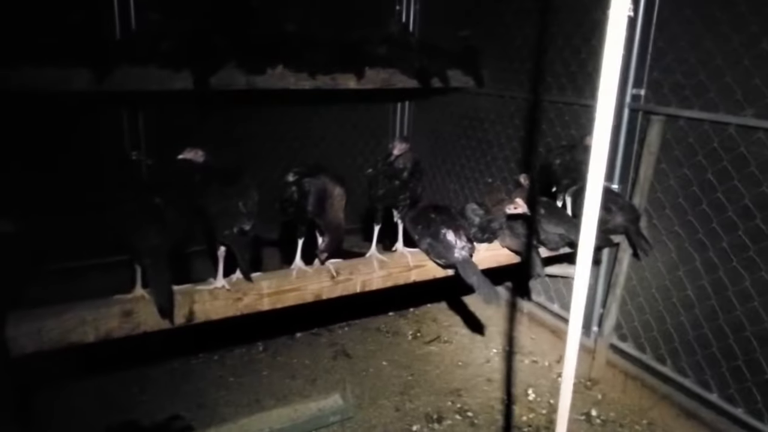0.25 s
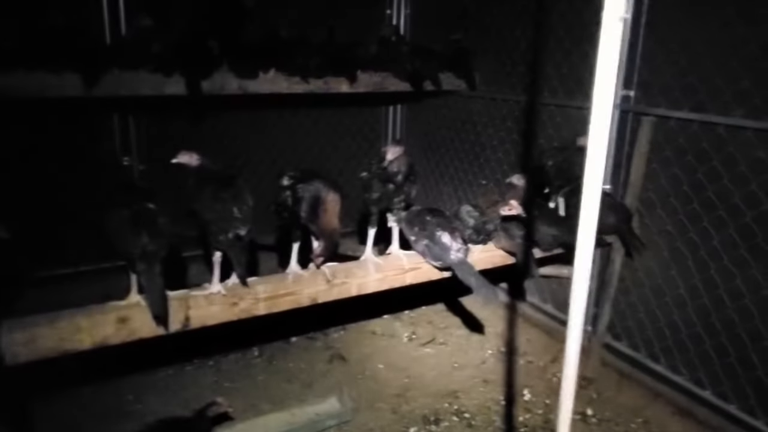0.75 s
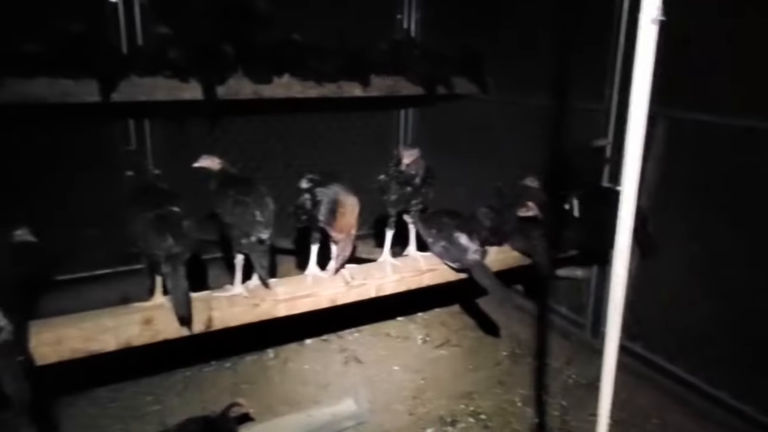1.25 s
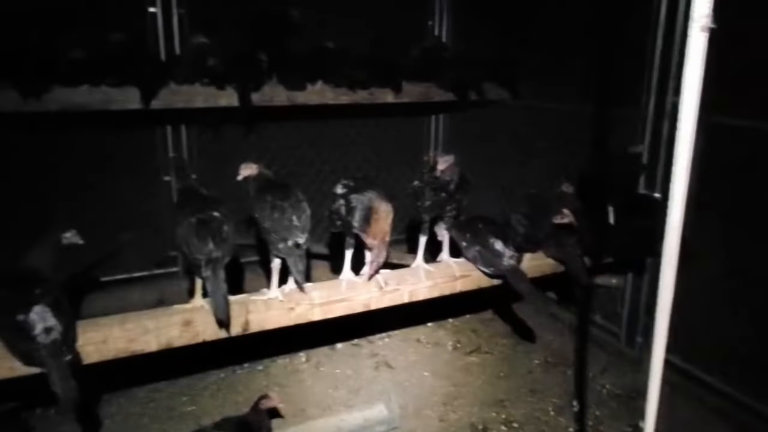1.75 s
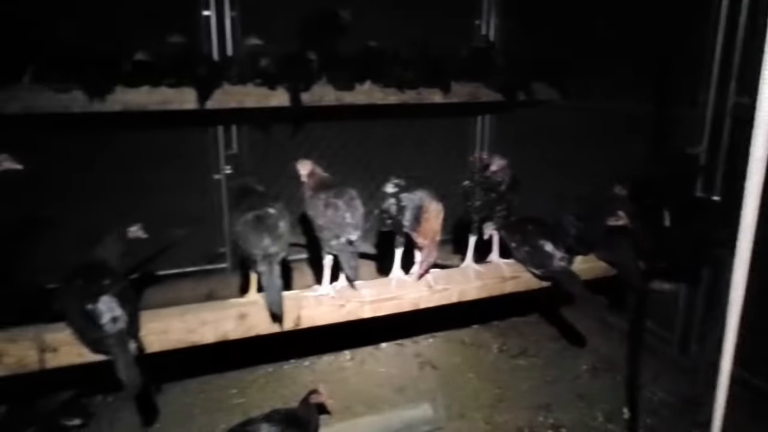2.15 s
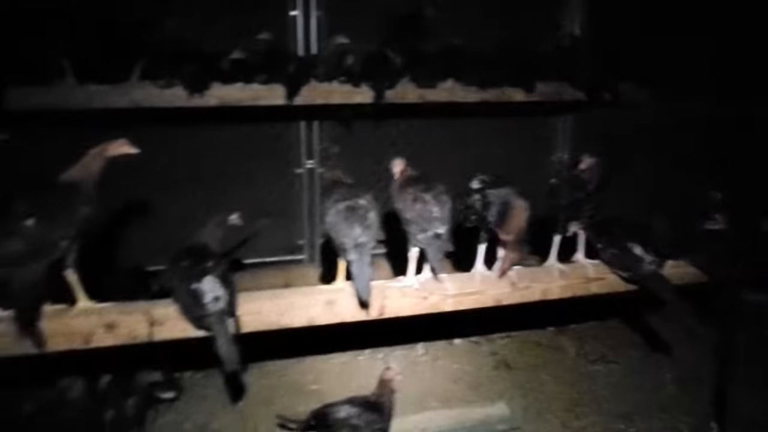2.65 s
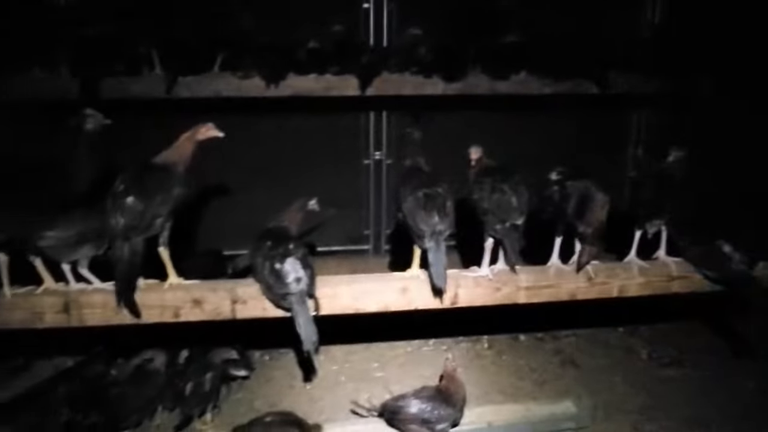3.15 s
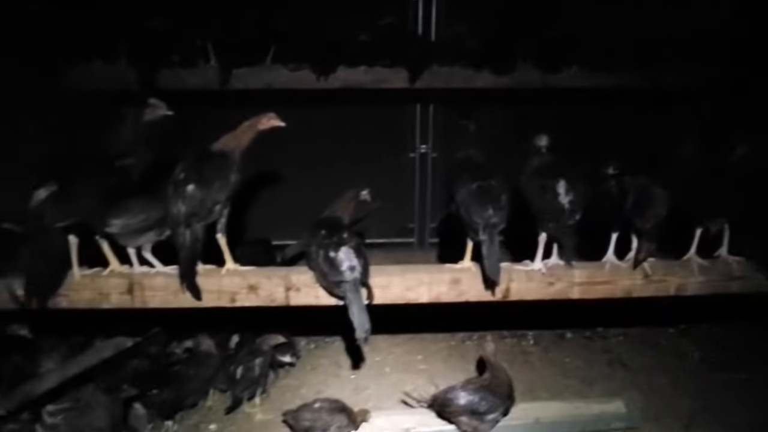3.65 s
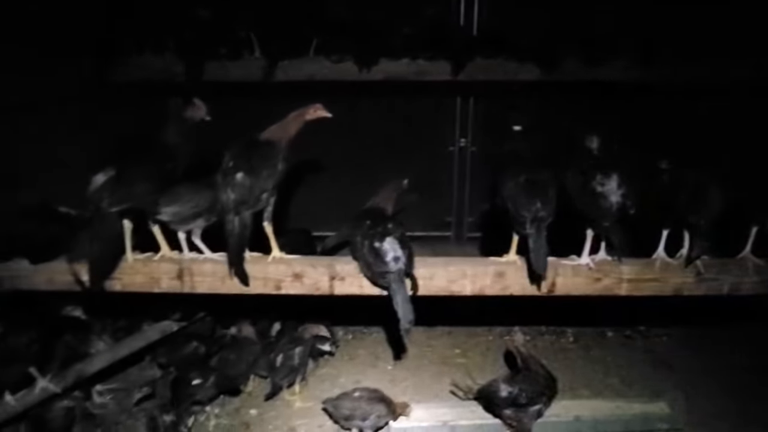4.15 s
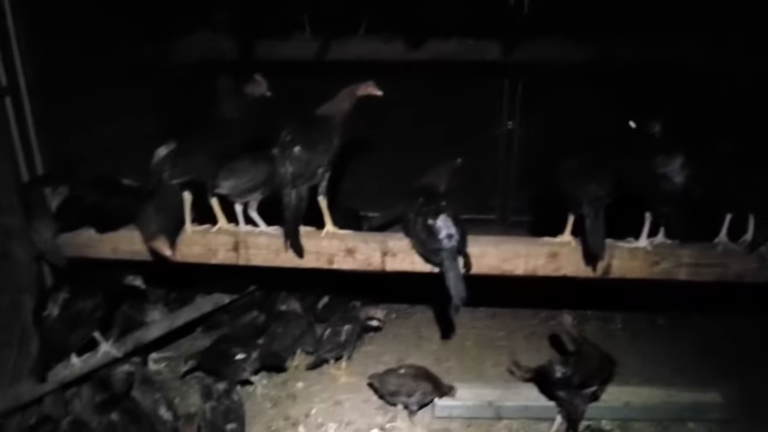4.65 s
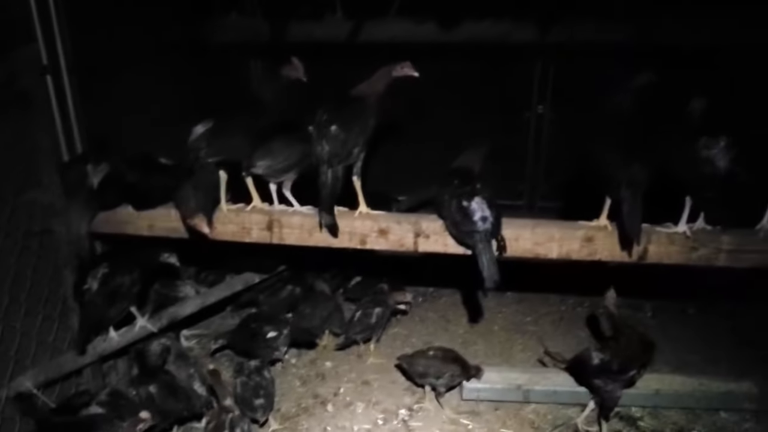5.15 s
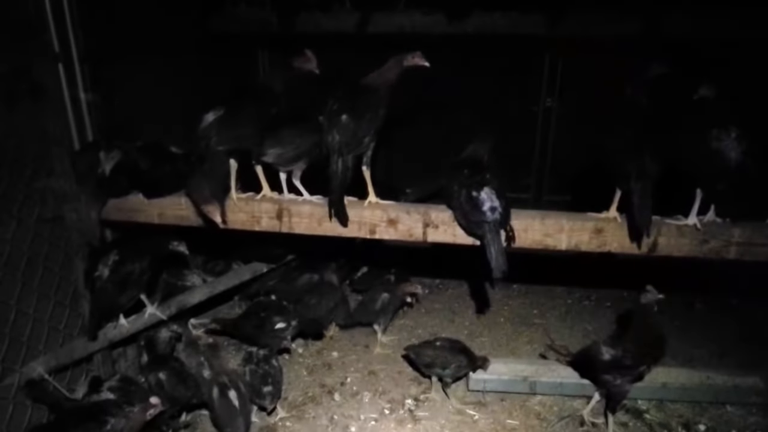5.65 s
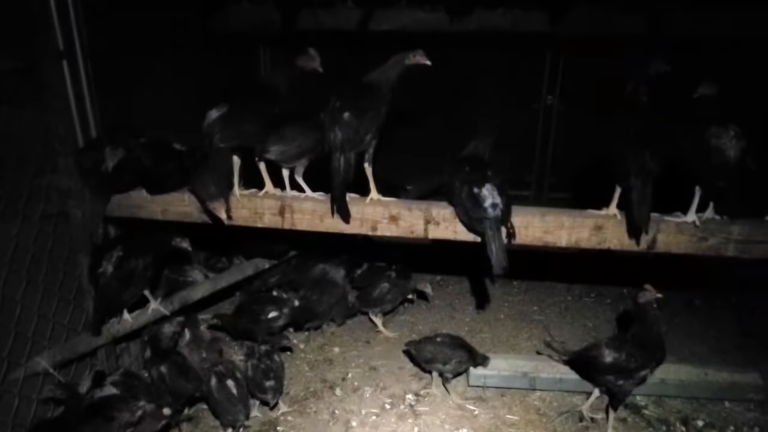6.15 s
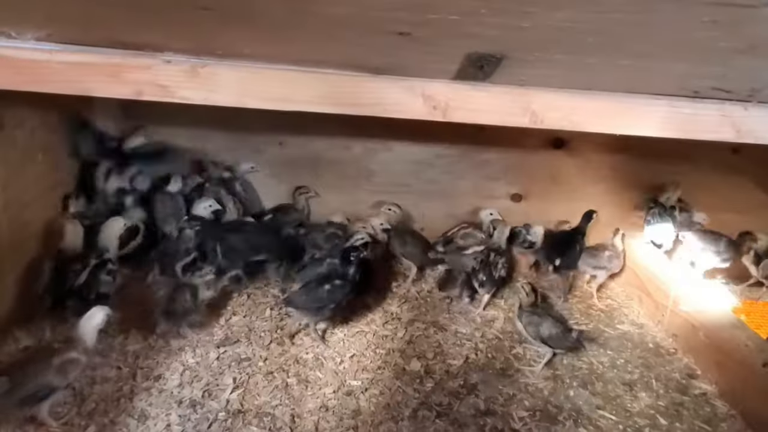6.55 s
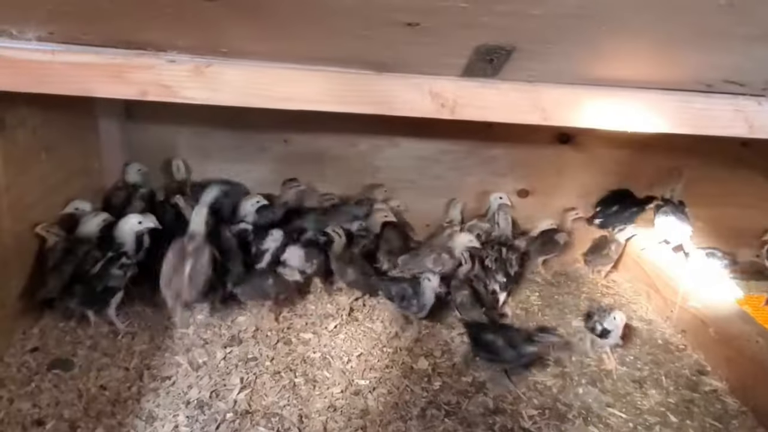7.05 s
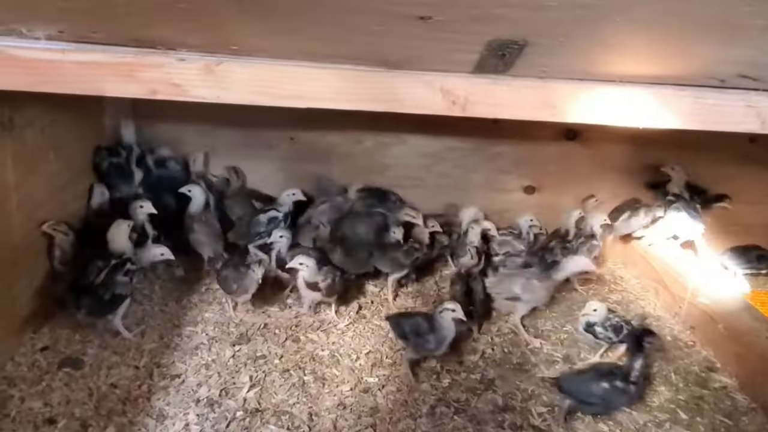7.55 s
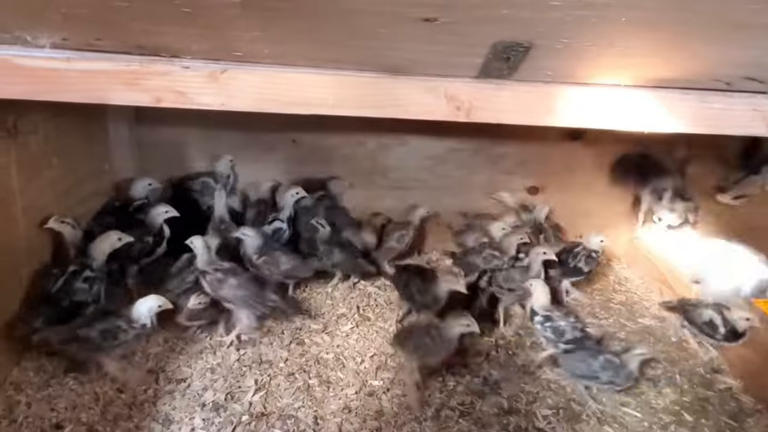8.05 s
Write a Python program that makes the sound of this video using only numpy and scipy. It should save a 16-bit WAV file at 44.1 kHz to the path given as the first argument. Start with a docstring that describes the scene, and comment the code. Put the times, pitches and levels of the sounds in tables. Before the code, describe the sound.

A calm night coop comes first: scattered high peeps, gentle trilling, hoarse drawn-out hen voices, a few dry ticks and a light bump, with modest room echo. After about a fifth of a second of silence, many chicks peep shrilly and densely at close range, scampering on a hollow wooden floor, scratching dry shavings. The box sounds tight and short, with stereo spread and brighter hiss on the left.

```python
"""Young birds trill softly on their roosts in a coop at night, while hens give long, wavering whines.
After a short silence, a crowd of chicks peeps loudly in a plywood box and scampers over the litter.
Peeps are gliding sine whistles with weak overtones; whines add strong overtones and rough side tones.
Ticks, bumps, night air, hiss, litter and breath are shaped noise; steps ring the floor of the box."""
import sys
import numpy as np
from scipy import signal
from scipy.fft import rfft, irfft, next_fast_len
from scipy.io import wavfile
from scipy.ndimage import uniform_filter1d, map_coordinates

SR = 44100
rng = np.random.default_rng(int(sys.argv[2]) if len(sys.argv) > 2 else 0)


def digitize_waveform(pressure):
    """Quantize a signal to 16-bit integers and store it at the path in sys.argv[1].

    Rows of a 2-D input are taken as channels; values are limited to [-1, 1].
    """
    field = np.atleast_2d(pressure).T
    bounded = np.clip(field, -1, 1)
    quanta = np.round(bounded * 32767).astype(np.int16)
    wavfile.write(sys.argv[1], SR, quanta)


N = 366471
COOP_END, BOX_START = 6.325, 6.538  # seconds; silence lies between them


def amp(db):
    """Turn decibels into a plain factor."""
    return 10 ** (np.asarray(db) / 20)


def unit(x):
    """Scale a signal to an rms (average strength) of 1."""
    return x / np.sqrt(np.mean(x ** 2) + 1e-20)


def along(points, hz):
    """Read a curve of (Hz, value) points on a log frequency axis."""
    f, v = np.transpose(points)
    return np.interp(np.log(hz + 1), np.log(f + 1), v)


def curves(rows):
    """One value per sample for each column after the time."""
    s, *cols = np.transpose(rows)
    return [np.interp(np.arange(N) / SR, s, c) for c in cols]


def during(start, end, fade):
    """1 between two times, with short ramps."""
    t = np.arange(N) / SR
    return np.clip(np.minimum(t - start, end - t) / fade, 0, 1)


def wobble(rate, size=N):
    """A smooth random curve through `rate` random points a second."""
    points = rng.standard_normal(int(size * rate / SR) + 4)
    return map_coordinates(points, [np.arange(size) * rate / SR])


def filtered(x, response):
    """Multiply the spectrum of x by a response to frequency."""
    size = x.shape[-1]
    m = next_fast_len(size + SR // 2)
    return irfft(rfft(x, m) * response(np.fft.rfftfreq(m, 1 / SR)), m)[..., :size]


def add(track, s, sound):
    """Mix a sound into a track at time s."""
    part = track[..., max(0, round(s * SR)):][..., :sound.shape[-1]]
    part += sound[..., :part.shape[-1]]


# How alike left and right are in the noises.
# Each row: frequency in Hz, likeness from 0 (unrelated) to 1 (the same).
ALIKE = [(60, 0.98), (130, 0.92), (280, 0.82), (600, 0.68), (1300, 0.11), (3000, 0.091), (13000, 0.078)]


def rush(spectrum):
    """Stereo noise of rms 1, alike in the bass and nearly unrelated in the treble."""
    def mid_side(hz):
        turn = np.arccos(np.clip(along(ALIKE, hz), -1, 1)) / 2
        return amp(along(spectrum, hz)) * [np.cos(turn), np.sin(turn)]

    mid, side = filtered(rng.standard_normal((2, N)), mid_side)
    return unit(np.array([mid + side, mid - side]))


def room(x, t60, wet_db, walls_db, reach, lead_ms=0):
    """A voice from one spot: direct sound, a few wall echoes within reach seconds, and a diffuse tail."""
    t = np.arange(SR // 2) / SR
    tail = rng.standard_normal((2, len(t))) * amp(-60 * t / t60) * (1 - np.exp(-t / 0.0049))
    echo = amp(wet_db) * tail / np.linalg.norm(tail[0])
    for side in echo:
        spots = (rng.uniform(.001, reach, size=6) * SR).astype(int)
        side[spots] += amp(walls_db) * rng.standard_normal(size=6)
    # a positive lead brings the direct sound to the left earlier; it is held within 24 samples
    shift = int(np.clip(round(lead_ms / 1000 * SR / 2), -12, 12))
    echo[[0, 1], [12 - shift, 12 + shift]] += 1
    return signal.fftconvolve(x[None], echo / np.linalg.norm(echo, axis=1, keepdims=True), axes=1)


LEAD_MS_PER_DB = -0.37  # a call louder on the left arrives later there than on the right


def placed(call, db, pan_db, t60, wet_db, walls_db, reach):
    """A call at its level and left-right balance, with its echoes."""
    balance = amp([[pan_db / 2], [-pan_db / 2]])
    return amp(db) * balance * room(call, t60, wet_db, walls_db, reach, LEAD_MS_PER_DB * pan_db)


PEEP_ATTACK_S, PEEP_RELEASE_SHARE = 0.002, 0.24  # the release is a share of the length
ROOST_HOLD, BROOD_HOLD = 1.6, 1.5  # the higher this power, the longer a peep holds its pitch before it drops
# above this pitch a peep's octave fades, by this many dB per doubling
OCTAVE_KNEE_HZ, OCTAVE_FALL_DB = 3570, 19.5
ARCH = 0.01486  # the pitch path bulges upward by this share


def peep(length, start_hz, end_hz, swell_db, quaver, octave_db, twelfth_db, hold=ROOST_HOLD):
    """One gliding whistle of the syrinx (a bird's voice organ), slightly unsteady, with weak overtones."""
    size = int(max(length, .005) * SR)
    u = np.linspace(0, 1, size)
    glide = start_hz + (end_hz - start_hz) * u ** hold
    arc = glide * (1 + ARCH * np.sin(np.pi * u))
    phase = 2 * np.pi * np.cumsum(arc * (1 + quaver * wobble(262, size))) / SR
    ramp = np.minimum(u * length / PEEP_ATTACK_S, (1 - u) / PEEP_RELEASE_SHARE)
    gate = np.sin(np.pi / 2 * np.clip(ramp, 0, 1)) ** 2
    shape = unit(gate * amp(swell_db * (u - .5) + 2.3 * wobble(130, size)))
    octave = amp(octave_db - OCTAVE_FALL_DB * np.maximum(np.log2(arc / OCTAVE_KNEE_HZ), 0))
    upper = amp(twelfth_db) * (np.sin(3 * phase) + .5 * np.sin(4 * phase))
    return shape * (np.sin(phase) + octave * np.sin(2 * phase) + upper)


# Shrill calls in both places, most of which nearly hold their pitch or rise.
# Each row: start in seconds, length in seconds, starting pitch in Hz, end pitch in Hz,
# relative level in dB, left-right balance in dB (positive is louder on the left).
SHRILL_CALLS = [(0.327, .12, 4510, 4200, -50, 5), (0.463, 0.19, 4320, 4320, -47, 5),
                (0.649, 0.067, 4530, 4260, -45, 2), (1.356, 0.045, 4460, 4770, -50, 1.5),
                (0.737, 0.15, 4390, 4300, -48, -1.5), (0.988, 0.082, 4460, 4420, -57, 2.5),
                (4.297, 0.069, 4430, 4670, -49, -1), (5.995, 0.11, 4570, 4110, -48.5, 2),
                (6.615, 0.014, 2277, 4100, -17, -3), (6.791, 0.033, 4600, 4430, -28.5, 7),
                (6.817, 0.056, 4270, 4440, -24.5, -11.5), (6.854, 0.056, 4580, 4440, -23.5, 0.5),
                (7.78, 0.021, 4230, 4370, -16.5, -3.5), (7.911, 0.0256, 3490, 3960, -23, -5)]


def glides(peeps, start, end):
    """The listed peeps, and the shrill calls that start between two times."""
    return list(peeps) + [row for row in SHRILL_CALLS if start <= row[0] < end]


ROOST_WET_DB = -6


def crowd(start, end, count, length, high_hz, scatter, fall, spread_db, octave_db, t60, quaver,
          wet_db=ROOST_WET_DB, hold=ROOST_HOLD, fall_spread=0.716, swell_db=10):
    """Many birds at eight spots, each call a whistle of its own pitch, fall, length and strength."""
    spots = np.zeros((8, N))
    slots = start + (end - start) * (np.arange(count) + rng.random(count)) / count
    for i, (s, (a, b, c, d)) in enumerate(zip(slots, rng.uniform(-1, 1, size=(count, 4)))):
        hz = high_hz * (1 - scatter * abs(a))
        drop = fall * (1 + fall_spread * b)
        call = peep(length * np.exp(.5 * c), hz, hz * (1 - drop), swell_db, quaver, octave_db, -37.0, hold)
        add(spots[i % len(spots)], s, amp(spread_db * d) * call)
    mass = sum(room(x, t60, wet_db, -6, .02, rng.uniform(-0.41, .3))[:, :N] for x in spots)
    return unit(mass) * np.sqrt((end - start) * SR / N)  # as strong however short its span


# Colour of the night air. Each row: frequency in Hz, relative level in dB.
NIGHT = [(20, -31.5), (45, 2.5), (70, 3.5), (110, -2.5), (200, -10), (400, -14), (900, -15.5),
         (1600, -14.5), (2300, -13), (3000, -8), (4400, -18.5), (5200, -41), (8000, -46.5), (10000, -35.5),
         (12000, -61.5), (13200, -32)]
# Colour of the wavering hiss. Each row: frequency in Hz, relative level in dB.
HISS = [(1500, -12), (2300, -10.5), (3000, 1.5), (4300, -2.5), (5200, -12.5), (6800, -19), (8000, -21),
        (10000, -17.5), (13000, -40)]
HISS_DB = -59.5  # middle level; it wavers around this


def night():
    """The low air of the night, and a faint, wavering hiss."""
    air = amp(-48.5 + 0.31 * wobble(8)) * rush(NIGHT)
    return air + amp(HISS_DB + 2.5 * wobble(5) + 1.5 * wobble(25)) * rush(HISS)


# The mass of small voices in the coop. Each row: time in seconds, level in dB.
ROOST_CROWD = [(0.05, -43), (0.54, -43.5), (0.95, -48), (1.19, -47.5), (1.37, -52.5), (1.61, -48.5),
               (2.1, -53.5), (2.46, -43), (2.9, -48.5), (3.34, -42.5), (3.58, -43.5), (5.03, -43),
               (5.33, -47.5), (6.15, -40)]
# A burst of shrill trilling. Each row: time in seconds, level in dB.
FLURRY = [(0, -46), (.85, -41), (1.05, -40), (1.15, -60), (1.3, -82)]
# Single peeps on the roosts. Each row: start in seconds, length in seconds, starting pitch in Hz,
# end pitch in Hz, relative level in dB, left-right balance in dB (positive is louder on the left).
ROOST_PEEPS = [(0.024, 0.045, 2810, 2780, -43, -2.5), (0.226, 0.083, 3820, 3400, -42, 2),
               (0.265, 0.014, 1735, 2160, -34, -1), (0.317, 0.023, 2630, 2770, -38, -1),
               (0.341, 0.017, 2260, 1990, -37, -4), (0.388, 0.072, 3030, 2790, -44.0, -1.5),
               (0.434, 0.06, 3550, 2940, -49, 1.5), (0.509, 0.075, 3000, 2825, -36.5, -3),
               (0.627, 0.042, 3150, 2370, -35, -1), (0.706, 0.09, 3320, 2780, -56, -1.5),
               (0.867, 0.079, 3610, 3480, -51, 0), (0.956, 0.069, 3780, 3100, -49, -1.5),
               (1.024, 0.038, 4630, 3700, -43.5, -5), (1.046, 0.042, 3466, 3220, -42.5, -9),
               (1.084, 0.068, 3060, 2410, -44.5, -1), (1.239, 0.047, 3094, 2630, -43.5, 1),
               (1.363, 0.06, 3490, 3080, -42, -1.5), (1.394, 0.053, 3000, 2670, -35, 0),
               (1.43, 0.035, 1235, 1140, -43.5, 1), (1.449, 0.048, 2910, 2590, -45, -8),
               (1.488, 0.036, 1460, 1460, -43.5, 1), (1.499, 0.08, 4180, 3350, -52, 2),
               (1.563, 0.07, 2910, 2456, -45, -9), (1.668, 0.041, 3570, 3040, -45.5, -1),
               (1.684, 0.064, 3260, 2600, -40, 2), (1.757, 0.094, 3050, 2720, -42, 0),
               (1.866, 0.043, 2900, 2900, -48, 1.5), (1.894, 0.031, 3510, 3250, -50.5, 0.5),
               (1.993, 0.15, 3766, 3470, -46.5, -1), (2.409, 0.025, 3200, 2540, -37, -2.5),
               (2.482, 0.032, 3880, 3330, -45.5, -1), (2.724, 0.1, 3373, 2635, -38.5, 3.5),
               (3.067, 0.057, 3496, 2820, -43, 1), (3.235, 0.038, 4510, 3430, -49, -1.5),
               (3.246, 0.057, 2980, 2730, -48, 5), (3.396, 0.045, 3200, 2740, -39.5, 0),
               (3.434, 0.026, 2870, 2220, -40, 3), (3.506, 0.022, 2070, 1840, -36, 0.5),
               (3.533, 0.098, 4010, 3350, -44.5, 6), (3.629, 0.04, 1460, 1230, -43.5, 2),
               (3.72, 0.043, 2900, 2660, -40, -2), (3.819, 0.05, 3550, 2600, -37, -0.5),
               (3.884, 0.03, 3020, 2830, -36.5, 7), (3.996, 0.031, 2840, 2670, -49, 2),
               (4.064, 0.083, 3600, 3250, -50.5, -3), (4.104, 0.064, 4110, 3670, -47, -3.5),
               (4.203, 0.023, 2840, 2500, -35.5, -5), (4.336, 0.055, 2860, 2660, -45.5, -12),
               (4.343, 0.07, 3930, 3200, -41.5, -1), (4.388, 0.035, 2970, 2570, -46, 0.5),
               (4.4, 0.023, 4330, 3400, -46.5, -9), (4.596, 0.11, 4200, 3340, -33, 2),
               (4.604, 0.08, 3230, 2920, -39, -1.5), (4.615, 0.047, 1422, 1190, -41, 4),
               (4.76, 0.05, 3600, 3420, -48, 0.5), (4.856, 0.059, 3040, 2700, -49.5, -4),
               (5.1, 0.056, 2897, 2780, -37, 0), (5.446, 0.087, 4020, 3150, -40, 0),
               (5.569, 0.076, 4430, 3760, -54, 10), (5.714, 0.073, 4400, 3900, -46.5, 5.5),
               (5.942, 0.047, 3210, 3160, -34.5, 0.5), (5.996, 0.035, 3560, 3380, -44.5, 7),
               (6.163, 0.043, 3500, 3440, -47, 9)]
# Rasping chirrs. Each row: start in seconds, length in seconds, pitch in Hz, relative level in dB.
CHIRRS = [(0.019, 0.066, 2900, -42), (0.798, 0.047, 3232, -35.5)]
CHIRR_QUAVER = .1  # share of the pitch
MUTTER_DB = -58
RASP, RASP_BELOW_HZ = 0.14, 2160  # the lower a peep starts under this pitch, the more it rasps


def roost():
    """Drowsy young birds trill all over the coop; older ones mutter lower; single peeps stand out."""
    out = amp(curves(ROOST_CROWD)[0]) * crowd(
        -.1, COOP_END, count=300, length=.06, high_hz=4120, scatter=.3, fall=0.16, spread_db=4.0,
        octave_db=-31.0, t60=0.2, quaver=0.0096)
    out += amp(curves(FLURRY)[0]) * crowd(
        -0.15, 1.0, count=130, length=0.07, high_hz=4700, scatter=0.4, fall=0.09, spread_db=-0.5,
        octave_db=-31.5, t60=0.22, quaver=0.005)
    out += amp(MUTTER_DB) * crowd(
        0, COOP_END, count=80, length=.04, high_hz=2150, scatter=.25, fall=.1, spread_db=5,
        octave_db=-12, t60=.4, quaver=.03)
    for s, length, start_hz, end_hz, db, pan_db in glides(ROOST_PEEPS, 0, COOP_END):
        quaver = 0.0079 + RASP * max(1 - start_hz / RASP_BELOW_HZ, 0)
        call = peep(length, start_hz, end_hz, swell_db=0, quaver=quaver, octave_db=-31, twelfth_db=-38)
        add(out, s, placed(call, db + 4, pan_db, t60=0.35, wet_db=ROOST_WET_DB, walls_db=-8, reach=0.022))
    for s, length, hz, db in CHIRRS:
        call = peep(length, hz, hz, swell_db=-3, quaver=CHIRR_QUAVER, octave_db=-34, twelfth_db=-42)
        add(out, s, placed(call, db + 4, 0, t60=0.35, wet_db=3, walls_db=-3, reach=0.022))
    return out


# Upper overtones of a hen's voice. Each row: multiple of the fundamental, level in dB against the octave.
OVERTONES = [(3, -15.5), (4, -47), (5, -32.5), (6, -56), (7, -39), (8, -49), (10, -44.5), (11, -44)]
# Side tones, each halfway up to the next overtone.
# Each row: multiple just below, level in dB before the whine's own side-tone level is added.
SIDE_TONES = [(1, -9), (2, -11), (3, -3), (4, -17)]


def whine(pitch, low_db, high_db, rough, jitter, split_db):
    """A hen's thin, drawn-out voice: roughness flutters its pitch, and side tones split it."""
    size = len(pitch)
    flutter = jitter * rough * (wobble(209.1, size) + wobble(69.44, size))
    drift = 0.0039 * wobble(25.2, size)
    phase = 2 * np.pi * np.cumsum(pitch * (1 + flutter + drift)) / SR
    upper = np.sin(2 * phase) + sum(amp(db) * np.sin(k * phase) for k, db in OVERTONES)
    # the two sides of the syrinx fall out of step: the pattern repeats every second cycle
    split = sum(amp(db + 5.1 * wobble(31.4, size)) * np.sin((k + .5) * phase) for k, db in SIDE_TONES)
    return np.sqrt(2) * (amp(low_db) * np.sin(phase) + amp(high_db) * (upper + amp(split_db) * split))


# The hens' whines. Each row: start in seconds, length in seconds, time to the top in seconds,
# top pitch in Hz, end pitch in Hz, fundamental's relative level in dB, octave over the fundamental in dB,
# roughness from 0 to 1, side tones in dB, room echo in dB, lead of the left side in milliseconds.
WHINES = [(0, 0.63, 0.21, 928.5, 841, -54.5, 8, 0.92, -2, 2, 0.33),
          (0, 0.51, 0.21, 759, 726, -56, -6, 0.84, -20, 0, 0.31),
          (0.755, 0.79, 0.089, 812, 764, -57.5, 3.5, 0.5, -23.5, 2, 0.29),
          (2.085, 0.2, 0.14, 997, 926, -33.5, -5, 0.27, -11, 6, 0.24),
          (2.289, 0.051, .01, 855, 831, -35.5, -4, 0.1, -3, 2, 0.23),
          (2.334, 0.14, .085, 1006, 965, -35, -0.5, 0.37, -9.5, 2.5, 0.17),
          (2.458, .04, .005, 840, 746, -38.5, -10, 0.65, -14, 3, .17),
          (2.544, 0.1815, 0.1, 954.3, 932, -37, 4.5, 0.21, -30, 2, 0.17),
          (2.709, 0.18, 0.021, 904, 835.7, -34, 0.5, 0.45, -28, 1.5, 0.16),
          (2.93, 0.038, 0.0047, 769, 700, -42.5, -6, 0.6, -17, 7, 0.31),
          (3.11, 0.088, 0.053, 800, 804, -39.5, -1.5, 0.2, -7, -10.5, -0.23),
          (3.242, 0.13, 0.0051, 804, 792, -44, 4.5, 0, -37, -4, -0.22),
          (3.377, 0.19, 0.012, 792, 770, -37.5, -4, 0.03, -28, -15, -0.21),
          (3.591, 0.2, 0.0062, 770, 733, -42.5, -1.5, 0.26, -13, 0, -0.32),
          (3.766, 0.074, 0.016, 626, 570, -41, -11, 0.8, 5, 0, -0.16),
          (3.84, 0.079, 0.0046, 578, 487.4, -52, -3, 0.8, 9.5, 5, -.2),
          (4.801, 0.18, 0.082, 790, 820, -52, -5, 0.1, -30.5, 5.5, -0.37),
          (4.966, 0.046, 0.044, 686, 677, -39.5, 2.5, 0.8, -2.5, -1, -0.3),
          (4.984, 0.2, 0.061, 892.6, 833, -38, 7, 0.44, -12, 6.5, -0.21),
          (5.19, .13, 0.095, 991, 956, -34, 6, 0.53, -18.5, 1, -0.25),
          (5.31, 0.042, 0.0053, 867, 690, -40, 0.5, 0.63, -0.5, -1, -0.11),
          (5.375, 0.038, 0.035, 787, 793, -42.5, -0.5, 0.6, 7, 0, -0.21),
          (5.405, 0.25, 0.14, 955.5, 884, -34, 6.5, 0.43, -16, 1.5, -0.3),
          (5.635, 0.17, 0.0033, 881, 818.4, -40, 9.5, 0.2, -13.5, 5.5, -0.3),
          (5.804, 0.51, .27, 940, 888.6, -38, 5.5, 0.12, -22.5, -0.5, -0.29)]
# a whine scoops up from the slack voice, or from this share under its top if that is lower
SLACK_HZ, SCOOP = 774, 0.036
SCOOP_POWER, SAG_POWER = 2.8, 1.35  # the scoop is steepest at first; the sag gets ever faster
WHINE_ATTACK_S, WHINE_RELEASE_S, WHINE_FADE_DB = 0.012, 0.06, 1.5  # the fade runs over the listed length
BREAK_ROUGH, BREAK_S = 0.5, 0.045  # extra roughness at the start, and how fast it dies away
WAVER_DB, WAVER_PER_S = 2.5, 21  # unsteady loudness: size, random points a second
COOP_T60_S = .42


def hens():
    """Each whine catches hoarsely, scoops up to its top pitch and sags toward its end."""
    out = np.zeros((2, N))
    for s, length, rise, top_hz, end_hz, db, octave_db, rough, split_db, wet_db, lead_ms in WHINES:
        t = np.arange(int((length + WHINE_RELEASE_S) * SR)) / SR
        depth_hz = max(top_hz - SLACK_HZ, SCOOP * top_hz)
        scoop_hz = depth_hz * (1 - np.minimum(t / rise, 1)) ** SCOOP_POWER
        sag_hz = (top_hz - end_hz) * np.clip((t - rise) / (length - rise), 0, 1) ** SAG_POWER
        faded_db = db - WHINE_FADE_DB * (t / length - .5)
        low_db = faded_db + WAVER_DB * wobble(WAVER_PER_S, len(t))
        high_db = faded_db + WAVER_DB * wobble(WAVER_PER_S, len(t)) + octave_db
        hoarse = np.clip(rough + BREAK_ROUGH * np.exp(-t / BREAK_S), 0, 1)
        voice = whine(top_hz - scoop_hz - sag_hz, low_db, high_db, hoarse, jitter=0.0276, split_db=split_db)
        gate = np.clip(np.minimum(t / WHINE_ATTACK_S, (t[-1] - t) / WHINE_RELEASE_S), 0, 1)
        add(out, s, room(voice * gate, COOP_T60_S, wet_db, walls_db=-17, reach=0.043, lead_ms=lead_ms))
    return out


# Sharp ticks close by. Each row: start in seconds, relative level in dB.
TICKS = [(0.1318, -32.5), (0.9383, -36.5), (2.363, -32.5), (3.017, -39.5), (5.692, -23), (5.945, -29),
         (5.992, -33)]
# Colour of the ticks. Each row: frequency in Hz, relative level in dB.
TICK_COLOUR = [(1500, -4), (3200, -1.5), (5000, -3), (7500, -19), (9150, -4.5), (11000, -14), (13000, -15)]
# Soft, dull bumps. Each row: start in seconds, relative level in dB.
BUMPS = [(1.154, -39.5), (6.3, -29.5)]


def knocks():
    """Dry ticks with a slower tail, and dull bumps: short, dying bursts of coloured noise."""
    t = np.arange(SR // 4) / SR
    ticks, bumps = np.zeros(N), np.zeros(N)
    for s, db in TICKS:
        add(ticks, s, amp(db - 15.0) * (amp(-60 * t / 0.014) + amp(1.5 - 60 * t / 0.21)))
    for s, db in BUMPS:
        add(bumps, s, amp(db + 8.5) * amp(-60 * t / 0.027) * (1 - np.exp(-(t / 0.00025) ** 2)))
    bump_colour = [(60, -36.5), (200, 9.0), (450, 4.5), (900, -1.0), (1800, -40.0), (4000, -120)]  # (Hz, dB)
    return ticks * rush(TICK_COLOUR) + bumps * rush(bump_colour)


# The mass of chicks; the litter also follows it. Each row: time in seconds, relative level in dB.
BROOD_CROWD = [(6.55, -26), (6.564, -20), (7.066, -24.5), (7.086, -23.5), (7.114, -30.5), (7.304, -22),
               (7.334, -28.5), (7.368, -28.5), (7.578, -22), (7.598, -19), (7.65, -27.5), (7.816, -19),
               (7.9, -27), (7.962, -19.5), (8.026, -27.5), (8.06, -24), (8.074, -28), (8.3, -19)]
# Single peeps in the box. Each row: start in seconds, length in seconds, starting pitch in Hz,
# end pitch in Hz, relative level in dB, left-right balance in dB (positive is louder on the left).
BROOD_PEEPS = [(6.542, 0.031, 4460.0, 2744, -21.5, -2.5), (6.577, 0.024, 3450.0, 1837, -19.5, -1.5),
               (6.59, 0.02, 2150, 1886, -27.5, 5), (6.595, 0.02, 3300.0, 2500, -26, -1.5),
               (6.629, 0.018, 3780.0, 1974, -27, 1.0), (6.641, 0.016, 2230.0, 2195, -16, 5.5),
               (6.681, 0.029, 3350.0, 2840, -24, -9.5), (6.716, 0.021, 4050.0, 1874, -18.5, -5.5),
               (6.768, 0.032, 3830.0, 3200.0, -34, -4.0), (6.784, 0.03, 3200.0, 2710, -28, 1.0),
               (6.837, 0.018, 3780.0, 2690, -22, -0.5), (6.863, 0.015, 4360.0, 2230, -21, -6.5),
               (6.883, 0.022, 3550.0, 2380, -23, -1.5), (6.907, 0.026, 4160.0, 2820.0, -27, -5.5),
               (6.965, 0.033, 4450, 3720, -33.5, -3), (6.971, 0.035, 3590.0, 2170, -26.0, -4.5),
               (7.007, 0.033, 3690.0, 2570, -31, -1.5), (7.06, 0.032, 3300.0, 2380, -21.5, -4.0),
               (7.072, 0.03, 3490.0, 2060, -21.5, 0), (7.085, 0.0186, 2300, 1840, -24, -2),
               (7.138, 0.031, 3830.0, 2466, -26, -4.5), (7.157, 0.017, 2810.0, 2280, -22.5, -2.5),
               (7.194, 0.036, 3010.0, 2040, -19.5, -3.0), (7.215, 0.015, 3980.0, 2630.0, -22, 0),
               (7.222, 0.035, 3500.0, 2165, -24, -1), (7.235, 0.035, 4200, 3630, -33, -6),
               (7.274, 0.04, 3880.0, 2696, -25, -8), (7.287, 0.01, 2620.0, 1920, -16, 1),
               (7.305, 0.014, 2100, 1775, -27, -1), (7.332, 0.043, 3780.0, 2064, -25, 0.5),
               (7.362, 0.023, 2960.0, 1954, -20, -4), (7.404, 0.028, 3980.0, 2910.0, -25, -2),
               (7.463, 0.025, 3780.0, 2600, -24, -4), (7.493, 0.039, 3150.0, 2140, -26, 1.5),
               (7.565, 0.019, 2230.0, 1810, -25, 3), (7.583, 0.021, 4030.0, 2660, -20, -8.5),
               (7.602, 0.023, 3300.0, 2470.0, -20, -1), (7.691, 0.0272, 3010.0, 2535, -21, -1.5),
               (7.732, 0.028, 3800.0, 2750, -22.5, -6), (7.796, 0.014, 4560.0, 2790, -13.5, -7),
               (7.814, 0.012, 3880.0, 2730.0, -11, -2.5), (7.822, 0.035, 3490.0, 2920, -18.5, -4.5),
               (7.862, 0.035, 3440.0, 2920, -23.5, -2.0), (7.871, 0.02, 1890.0, 1810, -28.5, 6),
               (7.928, 0.015, 3930.0, 3260, -17, -7.5), (7.947, 0.022, 4030.0, 2740, -18, -2.0),
               (7.966, 0.0096, 3800.0, 2510, -14, -6.5), (7.982, 0.019, 3040.0, 2060, -24.5, 0.0),
               (8.032, 0.041, 3640.0, 2410, -25.5, 0.0), (8.092, 0.016, 1870.0, 1710, -32.5, 6),
               (8.112, 0.028, 3200.0, 1830, -22.5, 0.5), (8.238, 0.051, 3730.0, 1930, -26, 1),
               (8.27, 0.037, 3640.0, 2740, -29, 2.5)]
# Colour of the air that hisses through the beaks. Each row: frequency in Hz, relative level in dB.
AIR = [(3500, -19.5), (5200, -3), (6600, 6.5), (8200, -14.5), (9800, -6.5), (11500, -19.5), (13000, -10.5)]
AIR_DB = -31.5  # against the strength of the calls
LOW_CHEEP_DB = -8  # softer, lower cheeps, against the mass of chicks
BROOD_SWELL_DB = 6  # rise in loudness through a call
BROOD_QUAVER, QUAVER_PER_S = 0.0041, .12  # the longer a chick's call, the more it quavers
BOX_T60_S, BOX_WET_DB = .11, -8


def brood():
    """Chicks peep close by, each call holding its pitch and then plunging; plywood walls throw it back."""
    mass = amp(curves(BROOD_CROWD)[0] - 1.0)
    out = mass * crowd(
        6.45, N / SR, count=280, length=.018, high_hz=4257, scatter=.33, fall=0.296, spread_db=4,
        octave_db=-29.5, t60=BOX_T60_S, quaver=0.0098, wet_db=BOX_WET_DB, hold=BROOD_HOLD,
        fall_spread=0.463, swell_db=7.5)
    out += amp(LOW_CHEEP_DB) * mass * crowd(
        6.45, N / SR, count=60, length=.016, high_hz=2590, scatter=.2, fall=.14, spread_db=5.5,
        octave_db=-17, t60=BOX_T60_S, quaver=0.0078, wet_db=BOX_WET_DB, hold=BROOD_HOLD,
        fall_spread=0.41, swell_db=0)
    for s, length, start_hz, end_hz, db, pan_db in glides(BROOD_PEEPS, BOX_START, N / SR):
        call = peep(length, start_hz, end_hz, BROOD_SWELL_DB, quaver=BROOD_QUAVER + QUAVER_PER_S * length,
                    octave_db=-30, twelfth_db=-49.5, hold=BROOD_HOLD)
        add(out, s, placed(call, db + 2.5, pan_db, BOX_T60_S, BOX_WET_DB, walls_db=-5.5, reach=0.011))
    # how loud the calls are over about 3 ms
    effort = np.sqrt(np.abs(uniform_filter1d(np.mean(out ** 2, axis=0), size=130)))
    return out + amp(AIR_DB) * effort * rush(AIR)


# Chicks landing on the floor. Each row: start in seconds, drumming in dB, scratching in dB.
LANDINGS = [(6.567, -37, -60), (6.772, -36, -30), (6.871, -35, -31), (6.958, -46, -21.5),
            (7.233, -24.5, -38), (7.365, -54, -58), (7.438, -26.5, -45), (7.536, -24, -64), (8.0, -41, -44),
            (8.088, -30, -72)]
# Low ringing tones of the box. Each row: frequency in Hz, width in Hz, relative level in dB.
BOX_MODES = [(90.3, 15.4, 2), (163.4, 9.7, -1), (66.4, 3.5, -37), (184, 13, -35), (318.3, 19.5, -12.5)]
# Colour of the scratching. Each row: frequency in Hz, relative level in dB.
LITTER = [(120, -6), (200, -2), (323, -1.5), (559, -8.5), (702, -6.5), (1160, -14.5), (1500, -15.5),
          (1950, -12.5), (3300, -120)]
# Colour of the rustling litter. Each row: frequency in Hz, relative level in dB.
RUSTLE = [(900, -23), (1500, 1.5), (3000, 17), (5000, 4), (6700, -9.5), (8200, -36), (10000, -9),
          (11500, -22), (13000, -14)]
LANDING_RISE_S, LANDING_T60_S = 0.00077, 0.28
PATTER_DB, SCRATCH_DB = -31, -35.5  # the steady running about, on which the landings are added
STEPS_PER_S = 150
SWAY_S, SWAY_HZ, SWAY_DB, SWAY_T60_S = 6.965, 40.8, -17.5, 1.4  # the floor panel set swaying, half a second
RUSTLE_DB, RUSTLE_FOLLOWS = -32, 0.35  # the litter stirs more when the crowd calls louder


def feet():
    """Random small steps ring the floor's low tones; feet scratch the litter; the panel sways for a while."""
    t = np.arange(SR // 2) / SR
    landing = np.minimum(t / LANDING_RISE_S, 1) * amp(-60 * t / LANDING_T60_S)
    force, scratch = np.full(N, amp(PATTER_DB)), np.full(N, amp(SCRATCH_DB))
    for s, drum_db, scratch_db in LANDINGS:
        add(force, s, amp(drum_db) * landing)
        add(scratch, s, amp(scratch_db) * landing)
    steps = rng.standard_normal(N) * (rng.random(N) < STEPS_PER_S / SR)

    def panel(f):
        modes = sum(amp(db) * 1j * f * w / (c * c - f * f + 1j * f * w) for c, w, db in BOX_MODES)
        return modes / (1 + (f / 450) ** 4)  # soft feet: little above 450 Hz

    drum = force * unit(filtered(steps, panel))
    sway = np.sin(2 * np.pi * SWAY_HZ * t) * amp(-60 * t / SWAY_T60_S)
    add(drum, SWAY_S, amp(SWAY_DB) * sway * signal.windows.tukey(len(t), .15))
    stir_db = RUSTLE_FOLLOWS * curves(BROOD_CROWD)[0] + 2.45 * wobble(350) + 5.3 * wobble(30)
    return drum + scratch * rush(LITTER) + amp(RUSTLE_DB) * unit(amp(stir_db)) * rush(RUSTLE)


def scene():
    """The coop, a moment of silence, then the box of chicks."""
    coop = night() + roost() + hens() + knocks()
    box = brood() + feet()
    return coop * during(-1, COOP_END, 0.0049) + box * during(BOX_START, 10, 0.0011)


# The left side is brighter. Each row: frequency in Hz, left over right in dB.
BRIGHTER_LEFT = [(4500, 0), (5500, 4), (7200, 13.5), (13000, 10.5)]
TOP_HZ = 13400


def record(dry):
    """The sides differ in the treble; the loudest peaks are rounded; nothing is kept above the top."""
    x = filtered(dry, lambda hz: amp(along(BRIGHTER_LEFT, hz) * np.array([[.5], [-.5]])))
    x = x / (1 + np.abs(x / .92) ** 8) ** (1 / 8)
    return filtered(x, lambda hz: hz < TOP_HZ)


dry = scene()
out = record(dry)
digitize_waveform(out)
```